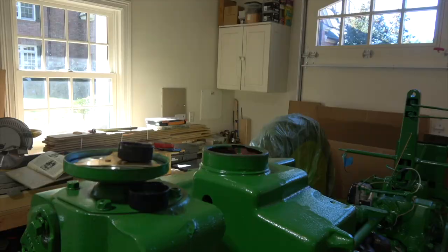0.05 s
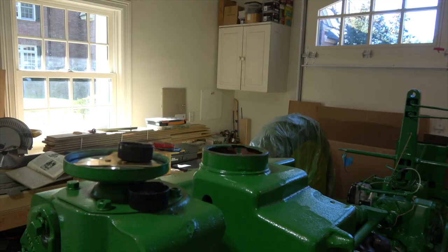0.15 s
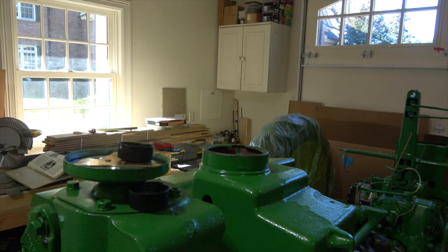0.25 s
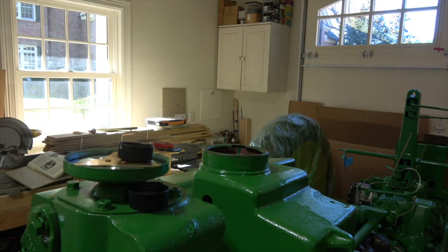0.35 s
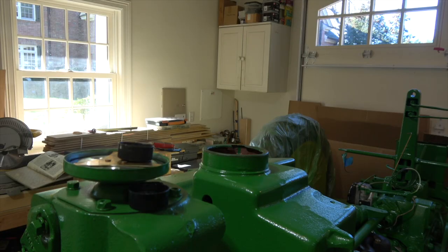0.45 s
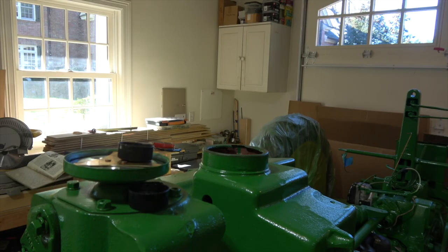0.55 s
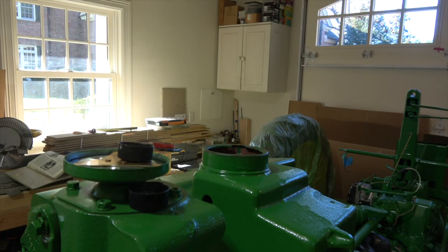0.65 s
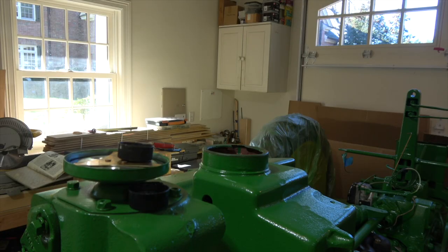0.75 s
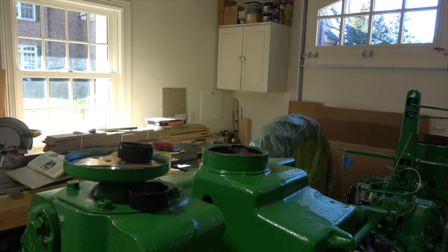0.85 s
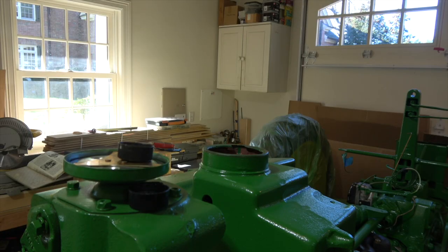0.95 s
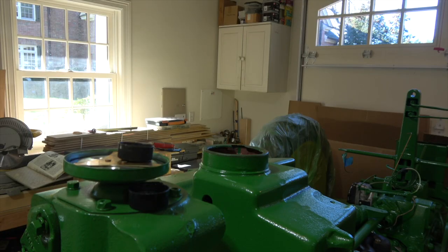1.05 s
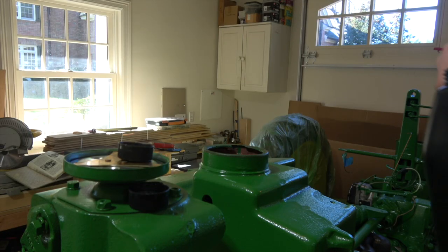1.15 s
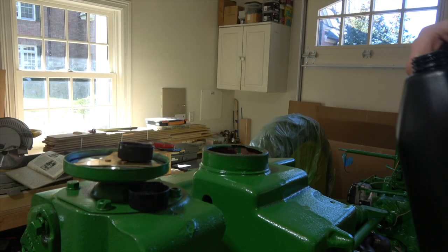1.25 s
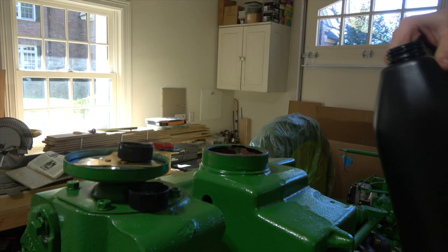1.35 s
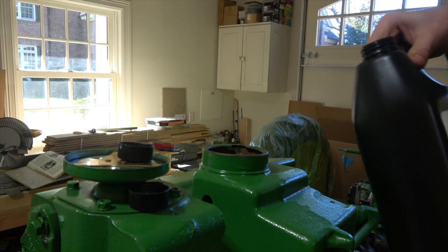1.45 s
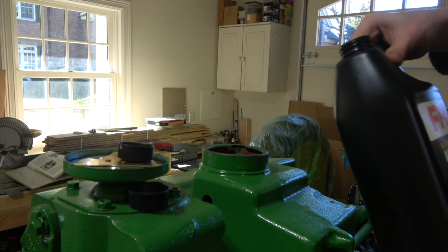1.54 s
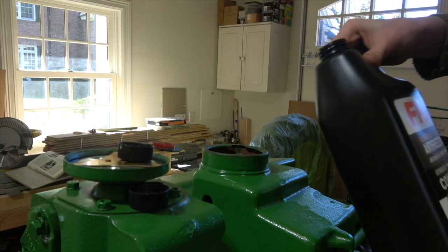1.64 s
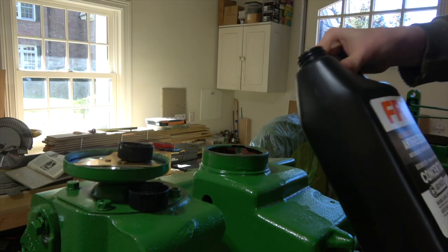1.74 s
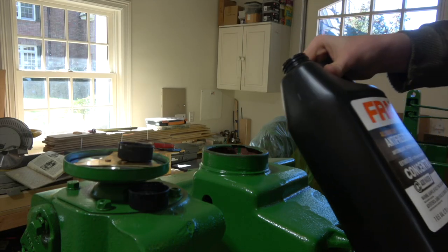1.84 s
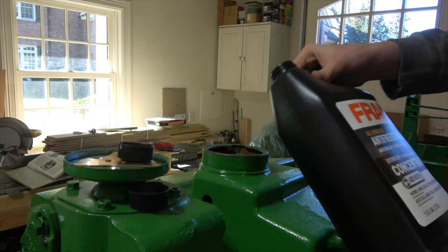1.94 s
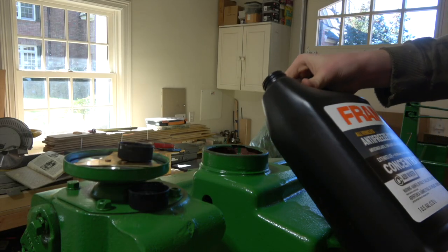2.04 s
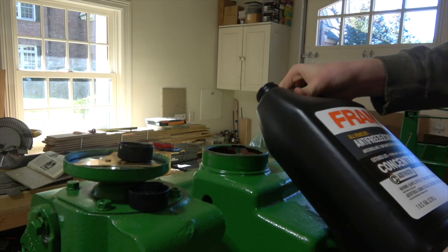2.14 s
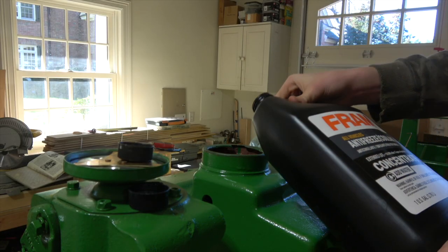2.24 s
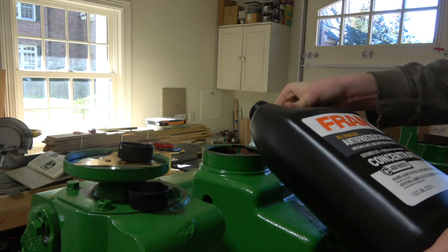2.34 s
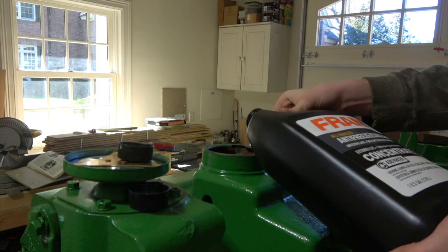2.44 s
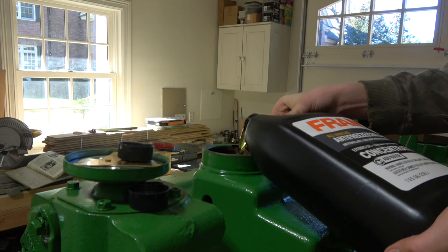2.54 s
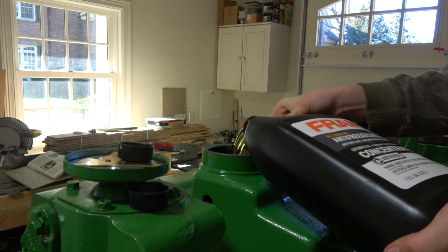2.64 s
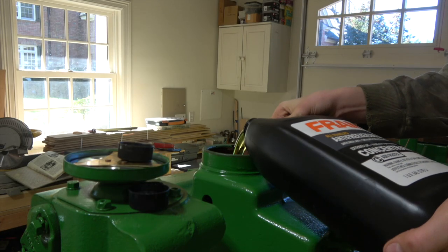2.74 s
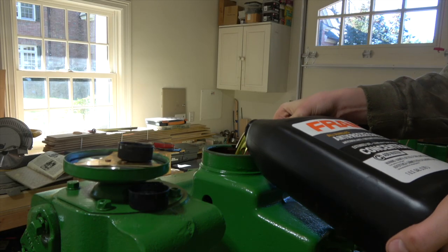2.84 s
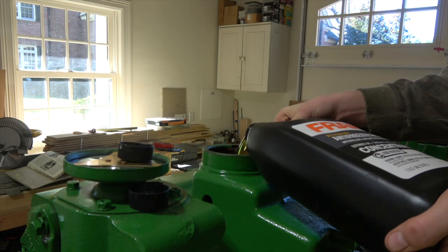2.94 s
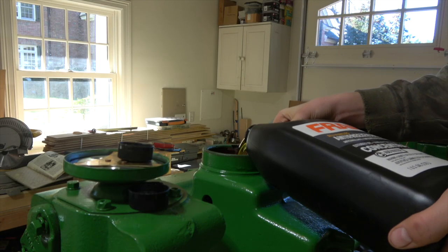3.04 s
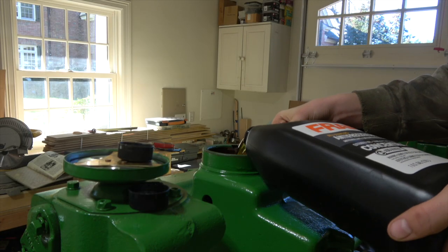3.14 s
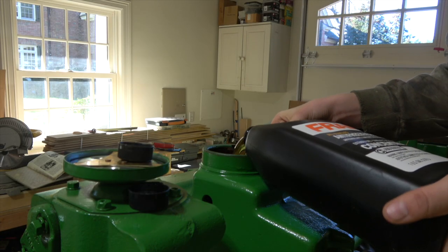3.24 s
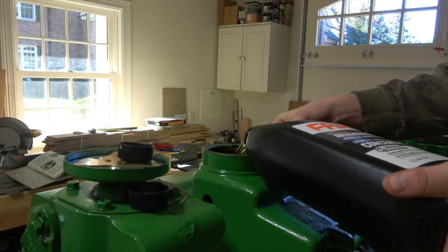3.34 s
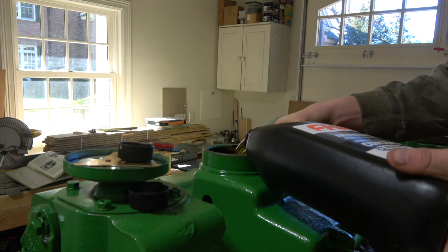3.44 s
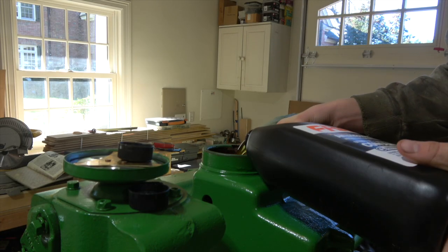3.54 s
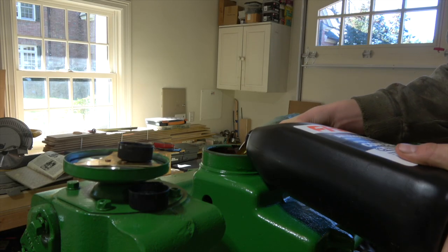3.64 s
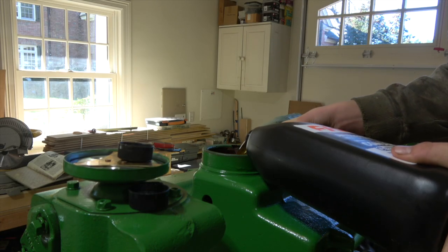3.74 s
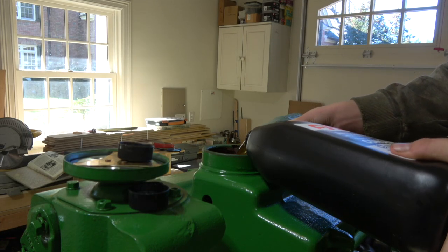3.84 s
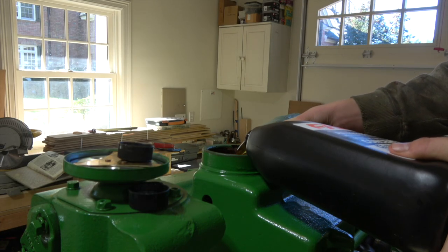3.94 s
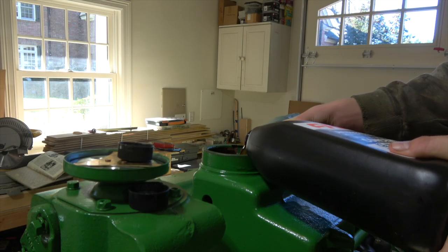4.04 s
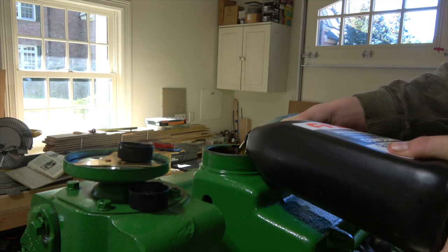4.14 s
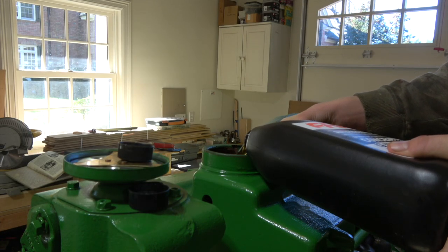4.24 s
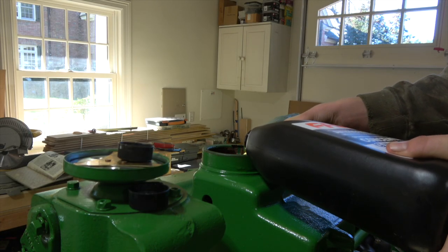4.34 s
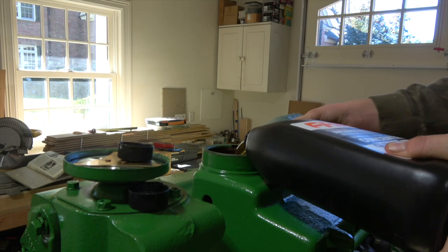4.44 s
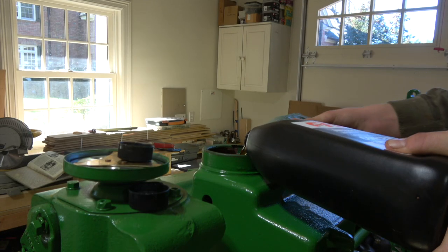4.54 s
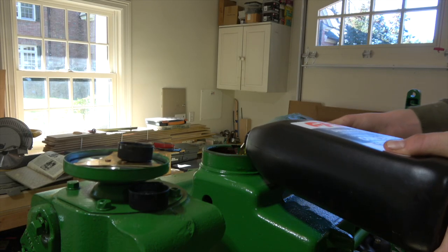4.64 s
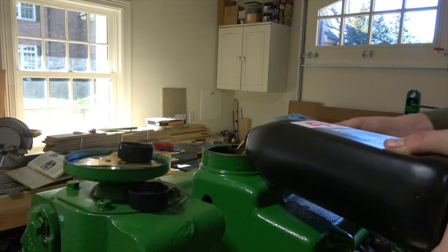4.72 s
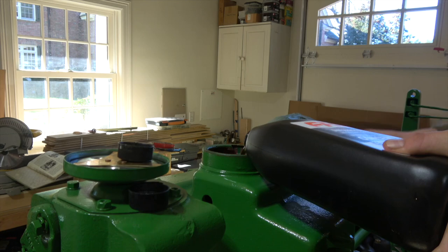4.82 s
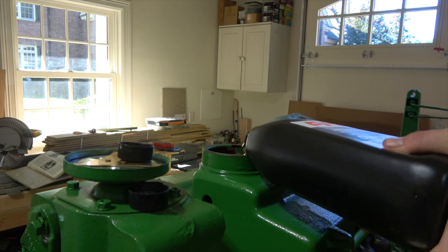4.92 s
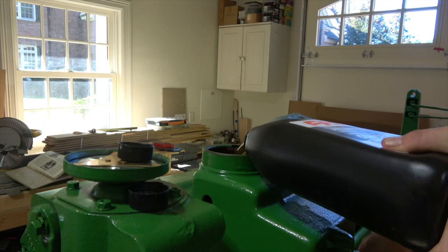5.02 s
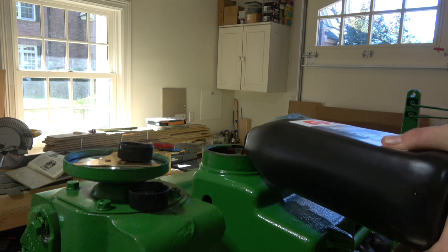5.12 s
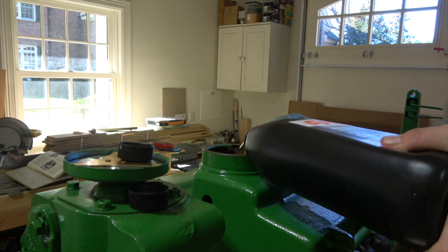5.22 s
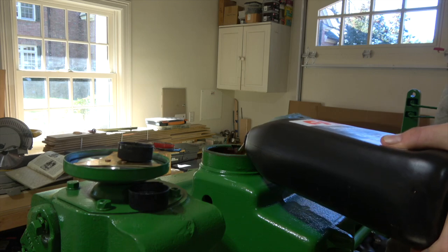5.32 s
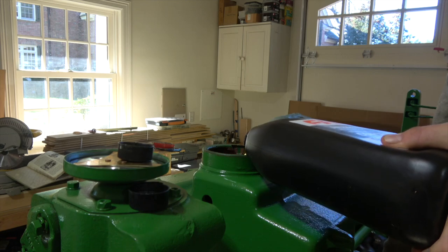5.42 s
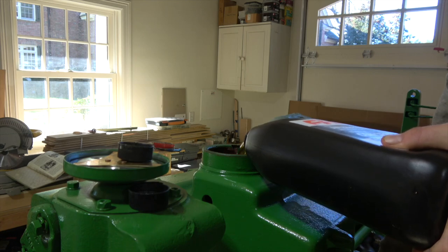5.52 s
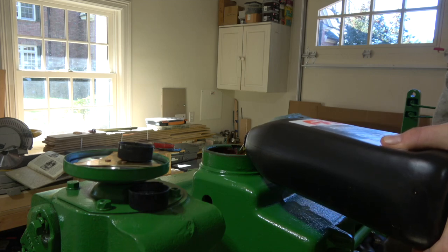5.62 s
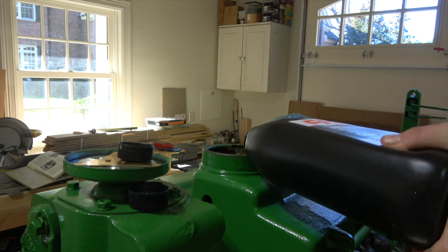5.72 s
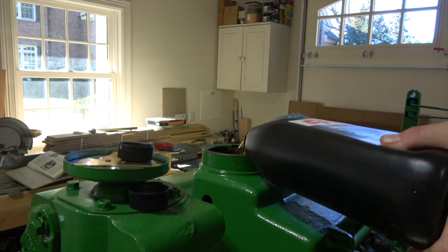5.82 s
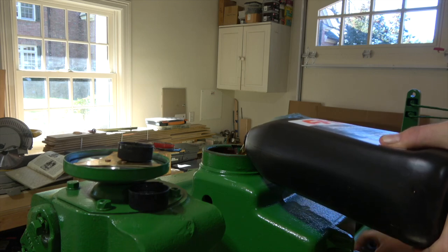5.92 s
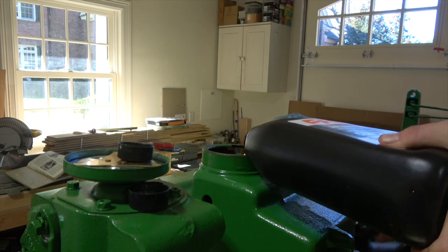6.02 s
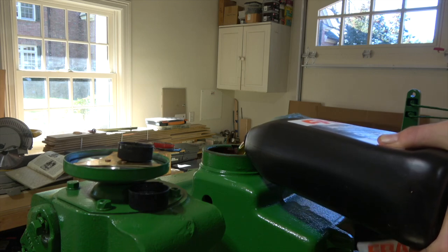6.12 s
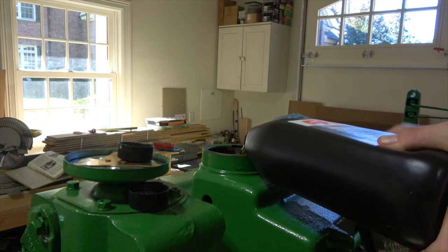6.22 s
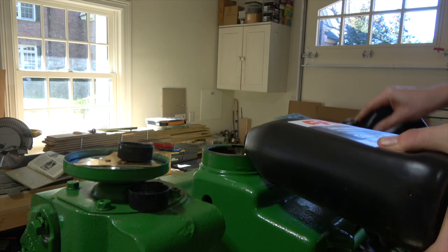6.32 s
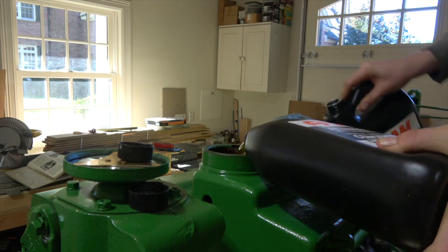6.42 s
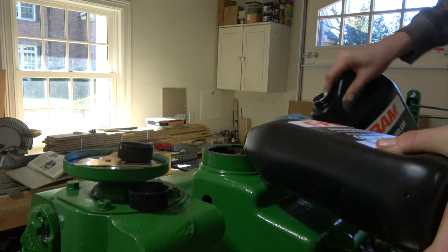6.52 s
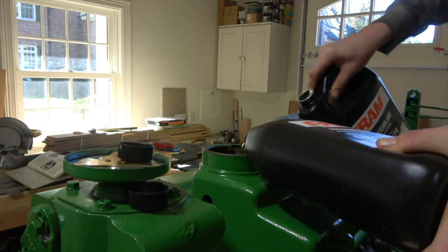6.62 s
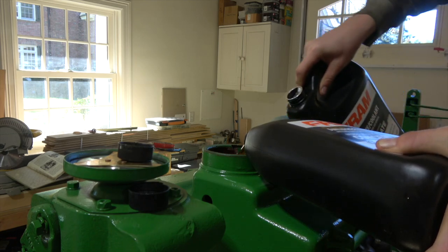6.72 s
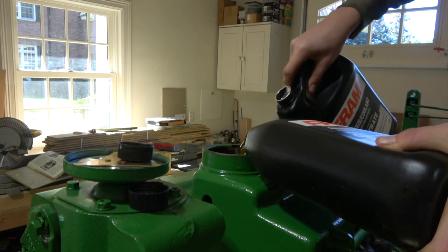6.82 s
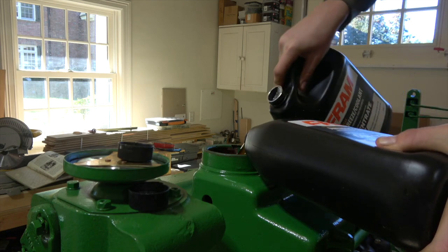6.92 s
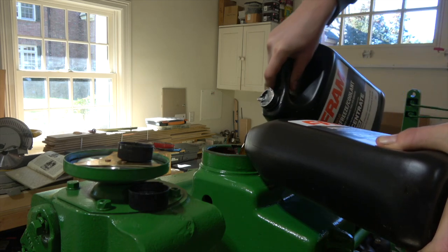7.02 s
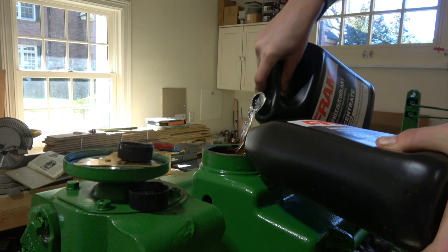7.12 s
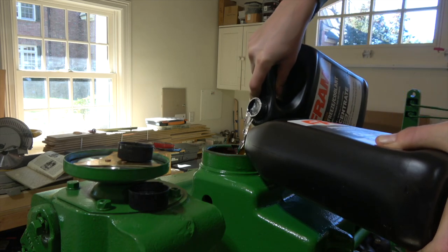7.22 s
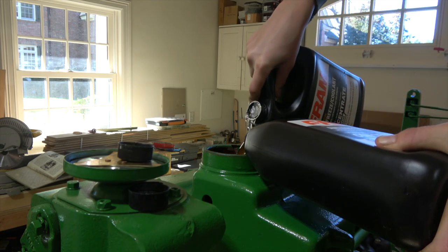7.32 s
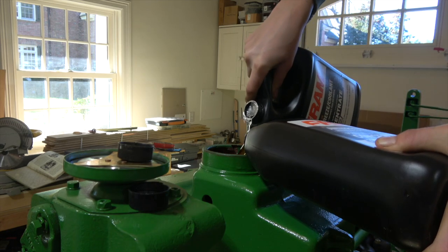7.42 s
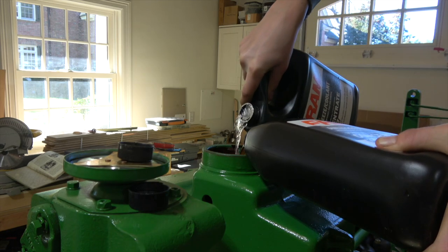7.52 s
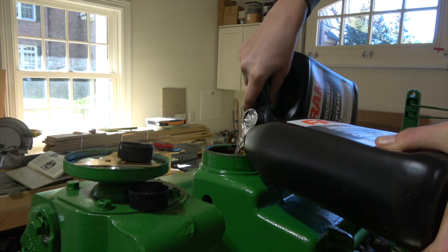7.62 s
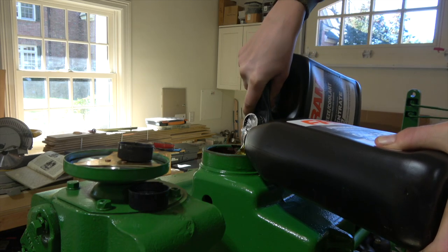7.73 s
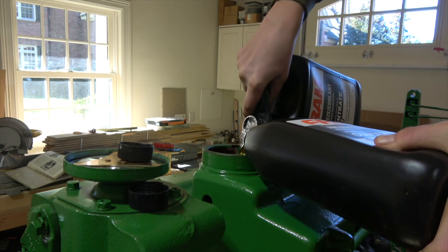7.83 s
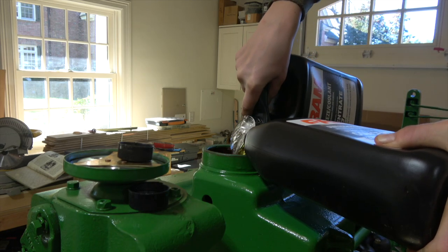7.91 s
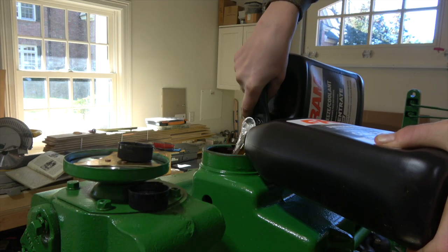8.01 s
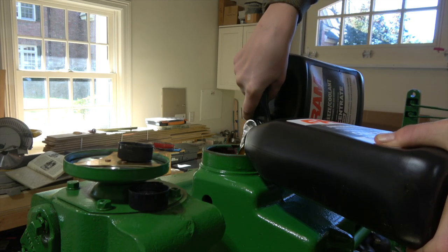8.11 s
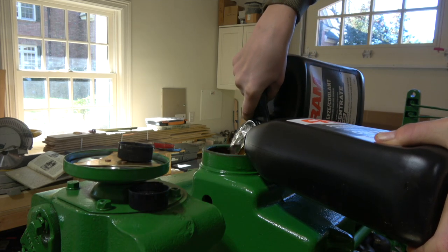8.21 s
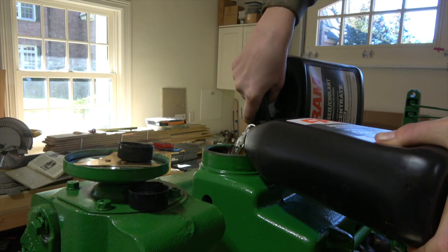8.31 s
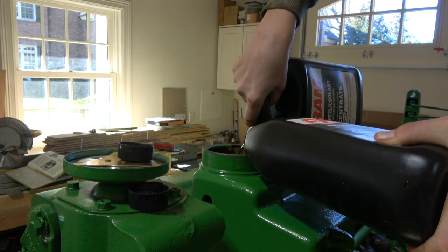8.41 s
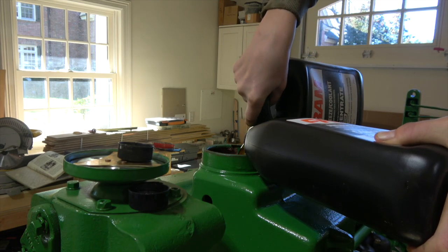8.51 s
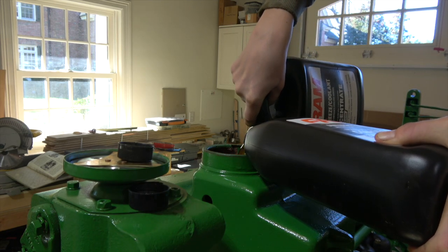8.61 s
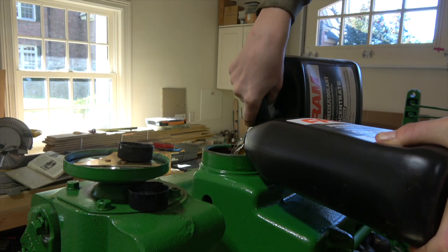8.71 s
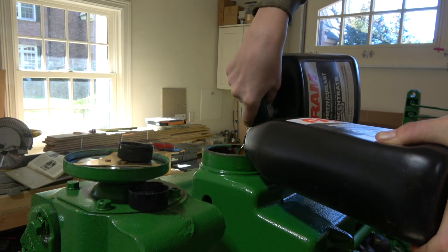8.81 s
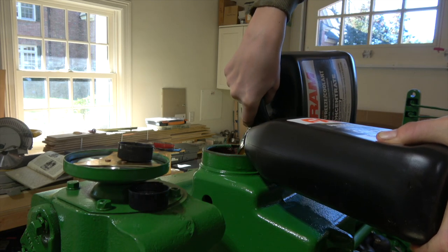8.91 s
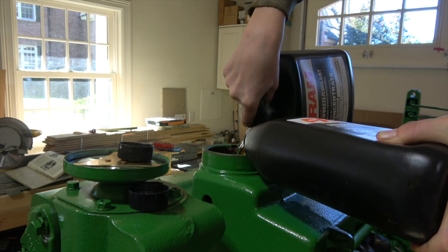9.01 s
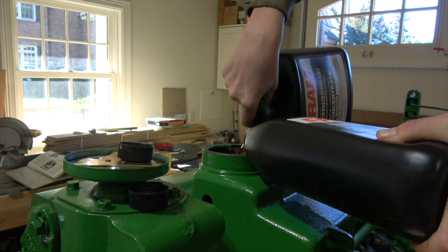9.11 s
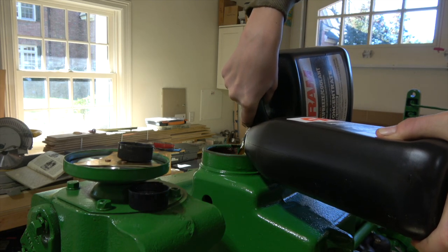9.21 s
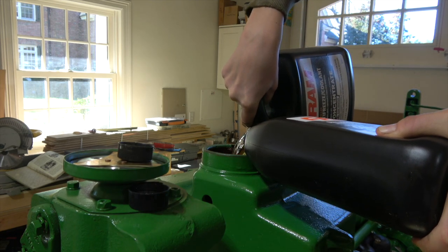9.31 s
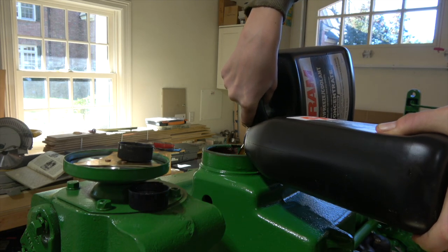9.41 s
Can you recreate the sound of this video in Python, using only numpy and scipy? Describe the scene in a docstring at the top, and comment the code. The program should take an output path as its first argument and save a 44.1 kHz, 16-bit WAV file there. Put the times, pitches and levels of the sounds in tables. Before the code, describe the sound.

In a small quiet workshop, faint scuffing and a dull thud come before hollow knocks of a handled plastic jug. Liquid then trickles and glugs about three times a second into a radiator's filler neck, with ringing bubbles. Later a second jug adds a continuous splashing stream, with low gurgles booming in the tank. Close microphone, short room reverberation.

```python
"""Coolant pours from two plastic jugs into a tractor radiator: noise and swarms of ringing bubbles, shaped
by the flow, resonate in the filler neck and the hollow tank. The first jug glugs three times a second;
from 7.3 s a second adds a splashing stream, and big pockets of air gurgle as runs of sinking bubbles.
Before this come filtered-noise shuffling, dull thuds of low resonances and the knocks of the lifted jug,
all in a small workshop with early reflections, a diffuse tail and a steady room noise."""
import sys
import numpy as np
from scipy import signal
from scipy.fft import rfft, irfft
from scipy.io import wavfile
from scipy.ndimage import uniform_filter1d

SR = 44100
rng = np.random.default_rng(int(sys.argv[2]) if len(sys.argv) > 2 else 0)


def waveform_to_disk(signal):
    """Save audio, clipped to [-1, 1], as 16-bit WAV at the path in sys.argv[1]."""
    frames = np.transpose(np.atleast_2d(signal))
    scaled = np.clip(frames, -1, 1) * 32767
    samples = np.round(scaled).astype(np.int16)
    wavfile.write(sys.argv[1], SR, samples)


N = 417186
TIME = np.arange(N) / SR  # seconds

# Large air bubbles ringing in the liquid; the first row, at 1.425 s, is instead the low ring of the jug wall
# under a knock. Each row: start in seconds, relative level in dB, pitch in Hz, life in seconds, upward glide
# from 0 to 1.
LARGE_BUBBLES = [(1.425, -20.5, 904, 0.0037, 0), (1.536, -35, 1000, 0.006, 0.1),
                 (1.588, -21.5, 603, 0.0031, 0.02), (2.603, -27.5, 835, 0.004, 0.5),
                 (3.001, -29.5, 1570, 0.0087, 0.28), (3.033, -29, 1600, 0.007, 0.23),
                 (3.129, -24, 3860, 0.0053, 0.6), (3.183, -23, 573, 0.0017, 0.3),
                 (3.369, -31, 1542, 0.022, 0.03), (3.504, -21, 1329, 0.03, 0),
                 (3.512, -15.5, 1650, 0.0062, 0.4), (3.536, -30, 433, 0.011, 0.26),
                 (3.566, -20.5, 1680, 0.004, 0.03), (3.649, -35.5, 783, 0.019, 0.12),
                 (4.04, -38.5, 492, 0.032, 0), (4.117, -32.5, 1850, 0.008, 0.07),
                 (4.138, -34, 1910, 0.013, 0.83), (4.39, -33.5, 1032, 0.041, 0.15),
                 (4.41, -30.5, 488, 0.045, 0.06), (4.513, -29, 3470, 0.0093, 0.1),
                 (4.845, -31.5, 833, 0.037, 0.06), (4.995, -23, 800, 0.0057, 0.03),
                 (5.147, -25, 835, 0.025, 0.07), (5.79, -25.5, 844, 0.012, 0.05),
                 (6.368, -11, 1985, 0.0032, 0.1), (6.378, -30.5, 809, 0.025, 0.05),
                 (6.714, -13, 2030, 0.0053, 0.3), (6.804, -18, 1363, 0.017, 0.9),
                 (7.31, -24.5, 770, 0.012, 0.3), (7.364, -15.5, 1770, 0.0055, 0.02),
                 (8.391, -19, 3020, 0.0051, 0.03), (8.625, -18, 650, 0.0072, 0.14),
                 (8.809, -11.5, 1186, 0.0037, 0.64), (8.811, -19.5, 818, 0.0045, 0),
                 (8.822, -9.5, 2830, 0.0026, 0.16)]
# Further heavy slugs of liquid landing, in and between the glugs and in the gush.
# Each row: start in seconds, relative level in dB, pitch of the trapped bubble in Hz.
FURTHER_SLUGS = [(3.297, -29.5, 3450), (4.339, -32, 4600), (4.384, -33, 1800), (4.934, -26, 723),
                 (6.6555, -40, 920), (6.7106, -23.5, 3350), (6.8868, -30, 1740), (7.299, -19, 2020),
                 (7.3355, -23, 1730), (7.366, -18, 3430), (7.3966, -19.5, 3170), (7.4428, -17.5, 1840),
                 (7.678, -24, 2060), (7.867, -32, 1310), (7.886, -17, 2730), (8.094, -18, 1250),
                 (8.162, -23, 2570), (8.646, -22, 3180), (9.277, -33, 2970)]
# Pockets of air breaking loose in the jug or the tank.
# Each row: start in seconds, relative level in dB, pitch in Hz, decay in seconds.
AIR_POCKETS = [(1.613, -35, 467, 0.08), (3.181, -35.5, 417, 0.039), (3.533, -34.5, 400, 0.03),
               (5.302, -31, 410, 0.064), (5.95, -35.5, 490, 0.1), (7.899, -26.5, 402, 0.017),
               (8.175, -31, 304, 0.072), (8.413, -15.5, 338, 0.03), (8.635, -33, 320, 0.023),
               (8.931, -31, 242, 0.033), (9.06, -24, 324, 0.01), (9.356, -30.5, 240, 0.016)]
# Knocks of the hand on the plastic jug.
# Each row: start in seconds, relative level in dB, level of the air inside relative to the knock in dB.
JUG_KNOCKS = [(0.7176, -32.5, -9), (1.4236, -24, -11.5), (1.5556, -39, -15), (1.6038, -25, -11),
              (1.825, -28.5, -6.5), (2.2066, -25.5, -7), (2.331, -33, -4.5), (2.5569, -29, -2.5),
              (2.603, -31, 2.5), (2.6673, -36.5, -19), (2.905, -32.5, -14.5)]
# Stray drops or tiny bubbles snapping close by. Each row: start in seconds, level in dB, pitch in Hz.
STRAY_DROPS = [(3.066, -21, 5540), (4.640, -18, 6530), (5.212, -12.5, 6600), (5.290, -21, 6300),
               (5.873, -21, 5800), (6.177, -19.5, 3200), (7.063, -38, 3900), (8.648, -11, 3420)]
# Dull thuds, the first made of several parts.
# Each row: start in seconds, relative level in dB, pitch in Hz, decay in seconds.
DULL_THUDS = [(.159,-24.5,130,0.014), (.160,-34,1300,0.042), (.190,-22,364,0.021), (.205,-27,57.7,0.06),
              (.82,-43.5,302,0.025)]
# Shuffling while the jug is fetched. Each row: time in seconds, relative level in dB.
SHUFFLE_LEVEL = [(0.0, -40.5), (0.17, -38), (0.438, -52), (0.68, -49), (0.74, -44.5), (0.966, -50.5),
                 (1.35, -54)]
# Noise spectra of shuffling, splashing and knocking. Each row: frequency in Hz, relative density in dB per Hz.
SHUFFLE_SPECTRUM = [(88, -38), (150, -3.5), (264, 3.5), (309, -6), (375, 5.5), (414, 2.5), (885, -2.5),
                    (957, -6), (4380, -6), (15900, -38)]
SPLASH_SPECTRUM = [(180, -75), (300, -3), (502, -15), (799, -0.5), (960, -5), (1360, -6.5), (1480, -8.5),
                   (1860, -0.5), (2130, -3.5), (3230, -2), (3510, -0.5), (4970, -3), (9340, -24),
                   (12000, -22.5), (15900, -35)]
KNOCK_SPECTRUM = [(100,-4), (450,-25), (1000,6.5), (2400,6), (4000,2), (5200,4), (7000,-9.5), (11000,-21.5),
                  (16000,-29)]
# Spectrum of the quiet room. Each row: frequency in Hz, relative density in dB per Hz.
QUIET_SPECTRUM = [(12, -66), (20, 12), (46, 2), (107, -3), (215, -13), (387, -15), (497, -13), (777, -20.5),
                  (1000, -16), (2890, -27), (4270, -26.5), (5050, -25.5), (7900, -39), (15900, -41.5)]
QUIET_DB = -47.5  # rms level
# Resonances of the filler neck and the hollow tank. Each row: frequency in Hz, width in Hz, relative level in dB.
NECK_MODES = [(808,100,-4), (1270,3.3,-3), (1680,25,-18), (1608,28,-9), (1840,170,-7.5), (2293,18,3.5),
              (3420,110,-7.5)]
TANK_MODES = [(50, 9.4, -6.5), (77, 18, 1.5), (104.6, 19, -10), (129, 9.2, 1), (153.3, 30.4, -4),
              (197.3, 19, -5.5), (249, 30, -8), (278.2, 14.2, -5.5), (383, 74, -12.5)]
# The air and walls of the jug. Each row: frequency in Hz, relative level in dB, time to fall 60 dB in seconds.
JUG_MODES = [(488,2,0.24), (551,-1.5,0.16), (440,-19,0.44), (1060,-20,0.31)]
# First reflections of the workshop. Each row: delay in seconds, level in dB.
FIRST_ECHOES = [(.0013,-28.5), (.0061,-25), (.0087,-14.5), (0.019,-29), (.033,-26.5), (.037,-36)]
# Reverberation of the workshop. Each row: frequency in Hz, time to fall 60 dB in seconds.
REVERB_TIMES = [(100,0.48), (500,0.47), (1700,0.52), (4600,0.37), (12000,0.15)]
# How hard the second jug's stream falls. Each row: time in seconds, relative level in dB.
GUSH_LEVEL = [(7.3, -37.5), (7.35, -25), (7.47, -39), (7.72, -36.5), (8.02, -31.5), (8.82, -34.5),
              (8.94, -33.5), (9.09, -35), (9.46, -34)]
# The gush dulls as it thickens. Each row: time in seconds, treble lift in dB per octave.
GUSH_TREBLE = [(7.3, 1.5), (9.46, 0.5)]
# Glugs of the first jug: runs of slugs landing in the filler neck, each trapping a bubble.
# Each row: first slug in seconds, last slug in seconds, first level in dB, its bubble in Hz,
# last level in dB, its bubble in Hz, trickle level in dB, treble lift in dB per octave; levels are relative.
GLUG_RUNS = [(3.12, 3.212, -27, 4020, -30, 4150, -55, 9), (3.447, 3.5018, -29, 3900, -24.5, 1890, -46.5, 2),
             (3.702, 3.759, -37.5, 2800, -31, 2390, -42.5, 0),
             (4.0725, 4.213, -34.5, 2000, -30, 2360, -51.5, 0.5),
             (4.407, 4.461, -27.5, 2640, -29, 3830, -46.5, 1),
             (4.6438, 4.7115, -24.5, 3800, -24.5, 2430, -43.5, -0.5),
             (4.9685, 4.9924, -26, 2350, -30.5, 1890, -39, -0.5),
             (5.201, 5.256, -26.5, 2140, -27.5, 2240, -41, 0),
             (5.4862, 5.5382, -25.5, 1840, -28.5, 1167, -40.5, -1),
             (5.7806, 5.831, -25, 3600, -36, 2080, -43, 0.5),
             (6.0336, 6.122, -26, 4340, -24.5, 4000, -43.5, 0.5),
             (6.3288, 6.3956, -32, 2050, -24, 2075, -48, -4),
             (6.607, 6.685, -30, 4950, -23.5, 5200, -44.5, -6.5),
             (7.0405, 7.13, -26.5, 2400, -34, 1840, -43.5, 3)]
# How fast the first jug runs. Each row: time in seconds, relative level in dB.
JUG_FLOW = [(2.95, -18), (3.3, -1.5), (5.6, 0.5), (7.2, -6.5), (9.46, 2)]
# Small bubbles swept under by the flow, two kinds in the glugs and one in the gush.
# Each row: lowest pitch in Hz, highest pitch in Hz, level over the flow in dB, life in cycles, greatest glide.
SMALL_CHIRPS = (1500, 5190, 3.33, 36, 0.063)
SMALL_PLOPS = (760, 1350, 7.8, 17, 0.25)
GUSH_BURBLES = (1100, 4000, 5.3, 15.8, 0.244)


def gain_of(db):
    """Decibels convert to amplitude as a power of ten."""
    return 10 ** (np.asarray(db) / 20)


def evened(x):
    """Division by the root mean square gives a signal of unit power."""
    return x / np.sqrt(np.mean(x ** 2) + 1e-20)


def read(points, hz):
    """A curve is interpolated on a logarithmic frequency axis."""
    f, value = np.transpose(points)
    return np.interp(np.log(hz + 1), np.log(f + 1), value)


def level(curve):
    """A level curve becomes a gain, silent outside its span; one that ends after 9 s is held."""
    s, db = np.transpose(curve)
    after = db[-1] if s[-1] > 9 else -120
    return gain_of(np.interp(TIME, s, db, left=-120, right=after))


def add(mix, s, sound):
    """Superposition: a sound is summed into the mix at time s."""
    part = mix[max(round(s * SR), 0):][:len(sound)]
    part += sound[:len(part)]


def coloured(x, points, size=2048):
    """A minimum-phase filter of unit energy imposes a spectrum causally."""
    log_gain = np.log(gain_of(read(points, abs(np.fft.fftfreq(size, 1 / SR)))))
    # the Hilbert transform of the log gain is the minimum phase
    taps = np.fft.ifft(np.exp(signal.hilbert(log_gain).conj())).real
    return signal.oaconvolve(x, taps / np.linalg.norm(taps))[:len(x)]


def resonate(x, hz, width):
    """A single complex pole rings at one frequency, with gain near one at its peak."""
    r = np.exp(-np.pi * width / SR)
    pole = r * np.exp(2j * np.pi * hz / SR)
    return 2 * signal.lfilter([1 - r], [1, -pole], x + 1e-18).real


def ring_modes(x, modes, extra_db=0):
    """A cavity's response is the sum of its resonances."""
    return sum(gain_of(db + extra_db) * resonate(x, hz, width) for hz, width, db in modes)


def bubble(hz, life, rise):
    """A bubble rings from the moment it closes, and its pitch climbs as it nears the surface."""
    age = np.arange(int(3.5 * life * SR) + 2) / SR / life  # in lives
    climb = 1 + np.log(2) * rise * np.minimum(age, 2.4) ** 1.35
    pitch = np.minimum(hz * climb, SR / 2)
    fade = np.clip(3.5 - age, 0, 1) / (1 + (age / .8) ** 3)
    return fade * np.sin(2 * np.pi * np.cumsum(pitch) / SR)


def froth(per_s, spread_db, cycles, glide, count=90):
    """A bubble swarm: small, high ones are many, even and steady; large ones few, uneven and gliding."""
    out = np.zeros(N)
    for hz in np.geomspace(550, 15000, count):
        bigness = min(1, 2800 / hz)
        life = cycles * rng.uniform(.3, 1.7) / np.sqrt(hz * 2000)
        grain = bubble(hz, life, glide * bigness * rng.random())
        plenty = (hz / 2500) ** .8  # relative number of bubbles at this pitch
        number = int(per_s * plenty * N / SR / count) + 1
        place, size, sign = rng.random((number, 3)).T
        size_db = spread_db * np.sqrt(bigness) * np.minimum(-np.log(1 - size), 3)
        strength = evened(gain_of(size_db)) * np.sign(sign - .5)
        at = (place[:, None] * (N - len(grain))).astype(int) + np.arange(len(grain))
        scaled = grain * np.sqrt(hz / plenty) / np.linalg.norm(grain)
        out += np.bincount(at.ravel(), (strength[:, None] * scaled).ravel(), N)
    return evened(out)


def quiet():
    """Stationary Gaussian noise of fixed spectrum forms the room's low rumble and hiss."""
    spectrum = rfft(rng.standard_normal(N)) * gain_of(read(QUIET_SPECTRUM, np.fft.rfftfreq(N, 1 / SR)))
    return gain_of(QUIET_DB) * evened(irfft(spectrum, N))


def workshop(x, tail_db=-7, onset=0.00033, count=3, sides=None):
    """Near surfaces reflect first; a diffuse tail dies away, slowly turning between several noise tails."""
    hz, t, z = signal.stft(rng.standard_normal((count, SR * 3 // 4)), SR, nperseg=256)
    decay = gain_of(-60 * t / read(REVERB_TIMES, hz)[:, None])
    tails = signal.istft(z * decay * (1 - np.exp(-t / onset)), SR, nperseg=256)[1]
    if sides is None:
        # the feed turns from tail to tail, 1.7 turns a second
        phase = 1.7 * TIME + np.arange(count)[:, None] / count
        turns = np.maximum(np.cos(2 * np.pi * phase), 0)
        fed = x * turns / np.linalg.norm(turns, axis=0)
    else:
        # a source that sounds different from each side feeds one tail from each, without turning
        fed = np.array(sides) / np.sqrt(count)
    diffuse = signal.oaconvolve(fed, tails / np.linalg.norm(tails[0]), axes=1).sum(0)[:N]
    out = x + gain_of(tail_db) * diffuse
    for s, db in FIRST_ECHOES:
        add(out, s, gain_of(db) * x)
    return out


def shuffle(shuffle_db=-2, grain_db=2):
    """Friction noise with slow random modulation gives a soft, slightly grainy scuffing."""
    grain = gain_of(grain_db * evened(uniform_filter1d(rng.standard_normal(N), size=200)))
    scuff = evened(coloured(grain * rng.standard_normal(N), SHUFFLE_SPECTRUM))
    return gain_of(shuffle_db) * level(SHUFFLE_LEVEL) * scuff


def swish(swish_db=-54):
    """Noise weighted to the treble swells and fades in a brief, bright swish, as of a sleeve."""
    swell = np.interp(TIME, [.79, .83, .87, .91], [0, 1, 1, 0])
    spectrum = [(1000, -29), (4000, 3), (7000, 1), (13000, -10), (16000, -19)]  # Hz, dB per Hz
    return gain_of(swish_db) * coloured(swell * rng.standard_normal(N), spectrum)


def tink(at_s=1.181, tink_db=-36, hz=3700, life=0.0048):
    """A short decaying sinusoid is heard as something small and hard tinking once."""
    out = np.zeros(N)
    add(out, at_s, gain_of(tink_db) * bubble(hz, life, 0))
    return out


def thuds(width_share=1.0, trim_db=-2.0):
    """Dull blows: noise through one broad resonance per row churns and decays exponentially."""
    out, t = np.zeros(N), np.arange(SR // 2) / SR
    for s, db, hz, decay in DULL_THUDS:
        width = hz * width_share
        churn = resonate(resonate(rng.standard_normal(len(t)), hz, width), hz, width)
        # dividing by the root of the envelope softens the fluctuations
        churn = evened(churn / np.sqrt(abs(signal.hilbert(churn))))
        envelope = (1 - np.exp(-t / 0.00036)) * np.exp(-t / decay)
        add(out, s, gain_of(db + trim_db) * churn * envelope)
    return out


def jug(air_db=-3, snap_decay=0.0027):
    """Impact excitation: the plastic wall snaps and the air inside rings briefly."""
    snaps, air, t = np.zeros(N), np.zeros(N), np.arange(SR // 3) / SR
    ring = sum(gain_of(db - 60 * t / t60) * np.sin(2 * np.pi * hz * t) for hz, db, t60 in JUG_MODES)
    for s, db, hollow_db in JUG_KNOCKS:
        snap = rng.choice([-1., 1.], len(t)) * np.exp(-t / snap_decay)
        add(snaps, s + 0.001154, gain_of(db) * snap)
        add(air, s + 0.002, gain_of(db + hollow_db + air_db) * ring)
    return coloured(snaps, KNOCK_SPECTRUM) + air


def tank(trickle_drum_db=-50, gush_drum_db=-17):
    """Forced resonance: falling liquid keeps the hollow tank humming, in step with both flows."""
    push = rng.standard_normal(N)
    hum = np.zeros(N)
    for hz, width, db in TANK_MODES:
        hum += gain_of(db) * evened(resonate(resonate(push, hz, 2 * width), hz, 2 * width))
    drive = np.hypot(gain_of(trickle_drum_db) * level(JUG_FLOW), gain_of(gush_drum_db) * gush())
    return drive * evened(hum)


def gurgles(flap_hz=130, gurgle_db=-2, cycles=1.16, sink=0.37, tank_db=9, pop_db=-14, lowest_hz=115, count=24):
    """Each pocket of air breaks up in a quick run of blubs that sink in pitch and boom in the tank."""
    out, pops = np.zeros(N), np.zeros(N)
    for s, db, hz, decay in AIR_POCKETS:
        gap, size, strength = rng.uniform(-0.81, 1, (3, count))
        delays = np.cumsum(1 + .5 * gap) / flap_hz
        delays = delays - delays[0]
        for delay, scale, blow in zip(delays, 2 ** (.5 * size), gain_of(1.1 * strength)):
            fresh = np.exp(-delay / decay)
            pitch = hz * scale * (1 - sink * (1 - fresh))
            blub = bubble(pitch, cycles / pitch, 0.26)
            pop = bubble(900 * scale, 0.0094, 0.055)
            add(out, s + delay, gain_of(db + gurgle_db) * blow * fresh * blub)
            add(pops, s + delay, gain_of(db + pop_db) * blow * fresh * pop)
    boom = ring_modes(out, TANK_MODES, tank_db)
    highpass = signal.butter(3, lowest_hz, "high", fs=SR, output="sos")
    return signal.sosfilt(highpass, out + boom) + pops


def drops(life=0.0011):
    """Strongly damped tiny bubbles: stray drops snap, over in a few cycles."""
    out = np.zeros(N)
    for s, db, hz in STRAY_DROPS:
        add(out, s, gain_of(db) * bubble(hz, life, 0.38))
    return out


def trickle(thread_db=-57, swell_s=0.13, ebb_s=0.08):
    """The first jug's flow: a thin thread keeps running, swells ahead of each glug and ebbs after it."""
    out = gain_of(thread_db) * level(JUG_FLOW)
    for start, end, *_, db, _ in GLUG_RUNS:
        outside = np.maximum(start - TIME, 0) / swell_s + np.maximum(TIME - end, 0) / ebb_s
        out = np.maximum(out, gain_of(db) * np.exp(-outside))
    first_s = JUG_FLOW[0][0]
    return out * np.clip((TIME - first_s) / (GLUG_RUNS[0][0] - first_s), 0, 1)


def gush(lead_s=0.021):
    """The second jug's flow follows its level curve; a few drops run ahead of it."""
    s, db = np.transpose(GUSH_LEVEL)
    return gain_of(np.interp(TIME, s, db)) * np.exp(-np.maximum(s[0] - TIME, 0) / lead_s)


def landings(middle_at=0.348, middle_db=-5):
    """Slugs strike three to a glug, besides the further ones; rows like those of FURTHER_SLUGS."""
    rows = list(FURTHER_SLUGS)
    for start, end, first_db, first_hz, last_db, last_hz, _, _ in GLUG_RUNS:
        middle_s = start + (end - start) * middle_at
        middle_hz = np.sqrt(first_hz * last_hz) * rng.uniform(.7, 1.2)
        middle = (middle_s, (first_db + last_db) / 2 + middle_db, middle_hz)
        rows += [(start, first_db, first_hz), middle, (end, last_db, last_hz)]
    return rows


def swept_under(kind, start, end, flow, count, spread_db=4):
    """Entrainment: chance bubbles strewn over a stretch follow the flow's level; rows as in LARGE_BUBBLES."""
    low, high, over_db, cycles, glide = kind
    when, size, strength, rise = rng.random((count, 4)).T
    s = start + (end - start) * (np.arange(count) + when) / count
    hz = low * (high / low) ** size
    flow_db = 20 * np.log10(np.interp(s, TIME, flow) + 1e-9)
    db = flow_db + over_db + spread_db * (2 * strength - 1)
    return list(zip(s, db, hz, cycles / hz, glide * rise))


def all_bubbles(early=0.06, late=0.08, trapped_db=-0.5, trapped_cycles=16.3, trapped_glide=0.106):
    """Air is entrained as large bubbles, one under every slug, and small ones in each glug and the gush."""
    rows, flow = list(LARGE_BUBBLES), trickle()
    for s, db, hz in landings():
        rows.append((s + 0.003, db + trapped_db, hz, trapped_cycles / hz, trapped_glide))
    for start, end, *_ in GLUG_RUNS:
        rows += swept_under(SMALL_CHIRPS, start - early, end + late, flow, count=7)
        rows += swept_under(SMALL_PLOPS, start, end, flow, count=1)
    return rows + swept_under(GUSH_BURBLES, GUSH_LEVEL[0][0], GUSH_LEVEL[-1][0], gush(), count=44)


def plinks(plink_db=-1, neck_db=-4):
    """Single bubbles ring freely, wobble as the surface heaves and excite the filler neck."""
    out = np.zeros(N)
    for s, db, hz, life, rise in all_bubbles():
        add(out, s, gain_of(db) * bubble(hz, life, rise))
    heave = uniform_filter1d(uniform_filter1d(rng.standard_normal(N), size=160), size=160)
    out = out * gain_of(2.5 * evened(heave))
    return gain_of(plink_db) * out + gain_of(neck_db) * ring_modes(out, NECK_MODES)


def in_neck(fizz, neck_db, steadiness):
    """Splashing excites the filler neck's resonances; the flow feeds it at a fairly even pace."""
    fizz = coloured(fizz, SPLASH_SPECTRUM)
    fizz = evened(fizz + ring_modes(fizz, NECK_MODES, neck_db))
    power = abs(uniform_filter1d(fizz ** 2, size=1300)) + 1e-6
    return evened(fizz / power ** (steadiness / 2))


def slugs(slug_db=-0.5, spray_db=-12, slap_db=-14, onset=0.0027, decay=0.011):
    """Impact on a liquid: each slug slaps the surface and bursts into a cluster of pitched droplets."""
    fizz = froth(per_s=1100, spread_db=6.0, cycles=8, glide=0.11) + gain_of(spray_db) * rng.standard_normal(N)
    burst, slap, t = np.zeros(N), np.zeros(N), np.arange(SR // 4) / SR
    for s, db, _ in landings():
        add(burst, s, gain_of(db) * (1 - np.exp(-t / onset)) * np.exp(-t / decay))
        add(slap, s + 0.0017, gain_of(db) * np.exp(-t / 0.013))
    spectrum = [(300, -8.5), (1000, 13), (5000, 10.5), (9000, -2.0), (16000, -40)]  # Hz, dB per Hz
    slap = coloured(slap * rng.standard_normal(N), spectrum)
    droplets = burst * in_neck(fizz, neck_db=0.5, steadiness=0.43)
    return gain_of(slug_db) * droplets + gain_of(slap_db) * slap


def treble_tilt(wet):
    """A time-varying spectral slope: each glug has its own brightness, and the gush slowly dulls."""
    hz, at, z = signal.stft(wet, SR, nperseg=512)
    s, *_, glug_lift = np.transpose(GLUG_RUNS)
    gush_lift = np.interp(at, *np.transpose(GUSH_TREBLE))
    lift_db = np.where(at < GUSH_LEVEL[0][0], np.interp(at, s, glug_lift), gush_lift)
    octaves = np.log2(np.clip(hz, 600, 12000) / 2500)[:, None]
    return signal.istft(z * gain_of(octaves * lift_db), SR, nperseg=512)[1][:N]


def stream(trickle_db=-3, gush_db=0.5, spray_db=-11, lump_db=4, lump_decay=0.0068):
    """Jet breakup: the trickle is a dense froth of uneven bubbles; the gush breaks into lumps of froth and spray."""
    uneven = froth(per_s=1400, spread_db=7.0, cycles=8, glide=.12) + gain_of(-13) * rng.standard_normal(N)
    fizz = froth(per_s=1500, spread_db=4.0, cycles=8, glide=0.16) + gain_of(spray_db) * rng.standard_normal(N)
    # about 200 lumps a second, each decaying exponentially
    lump_power = gain_of(lump_db * np.minimum(rng.exponential(1, N), 3)) ** 2
    lumps = lump_power * (rng.random(N) < 200 / SR)
    lumps = signal.lfilter([1], [1, -np.exp(-1 / (lump_decay * SR))], lumps)
    lumpiness = evened(np.sqrt(lumps + 0.06))
    thin = gain_of(trickle_db) * trickle() * in_neck(uneven, neck_db=0.0, steadiness=0.33)
    thick = gain_of(gush_db) * gush() * lumpiness * in_neck(fizz, neck_db=1.0, steadiness=1.0)
    return treble_tilt(thin + thick)


def scene():
    """All sources superpose in the workshop; single bubbles and stray drops are close and drier."""
    fetching = workshop(shuffle() + swish() + tink() + thuds(), tail_db=-8)
    knocking = workshop(jug(), tail_db=-5.0, sides=[jug(), jug(), jug()])
    close = workshop(drops(), tail_db=-12.0) + workshop(plinks(), tail_db=-9.5)
    pouring = workshop(stream() + slugs() + gurgles() + tank(), tail_db=-6.5)
    return (quiet() + fetching + knocking + close + pouring)[None]


def record(dry, edge_hz=16050):
    """A linear-phase low-pass filter limits the band."""
    taps = signal.firwin(511, edge_hz, window=("kaiser", 9), fs=SR)
    return signal.oaconvolve(dry, taps[None], "same")


dry = scene()
out = record(dry)
waveform_to_disk(out)
```